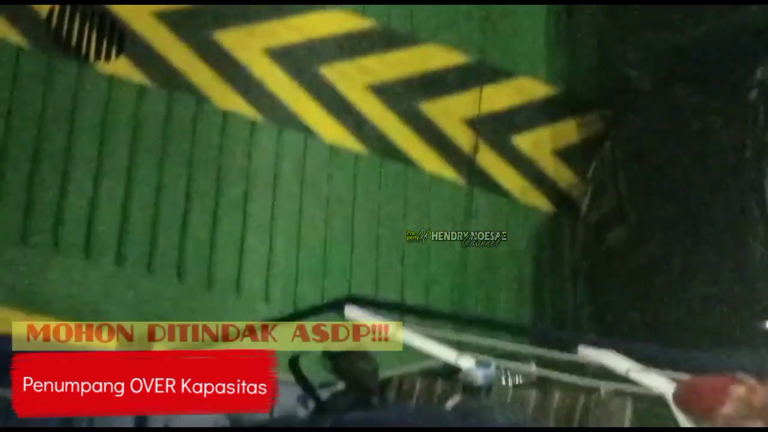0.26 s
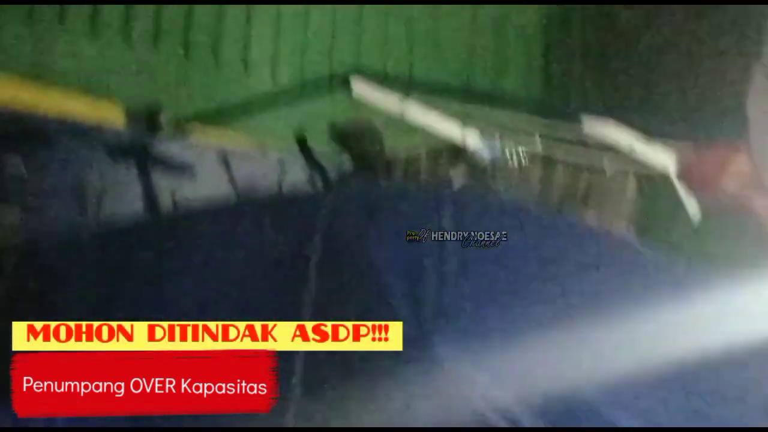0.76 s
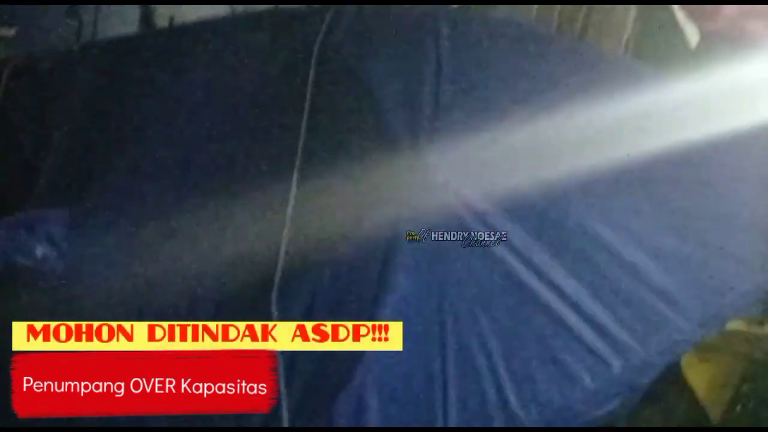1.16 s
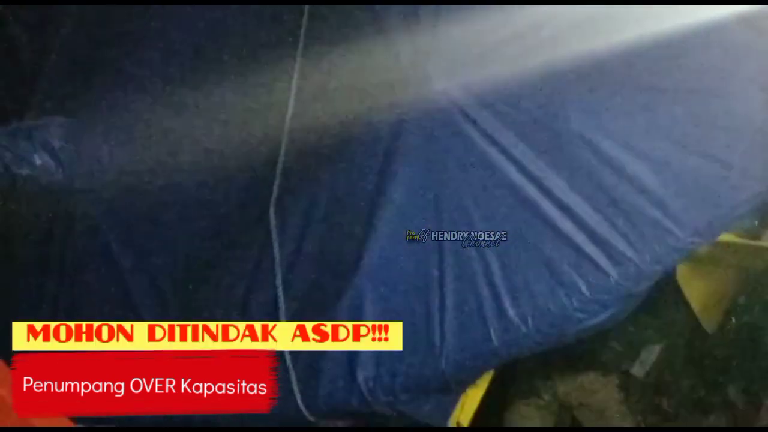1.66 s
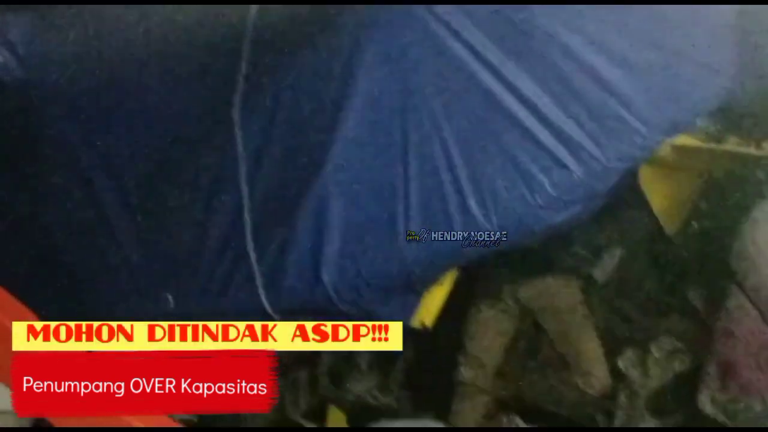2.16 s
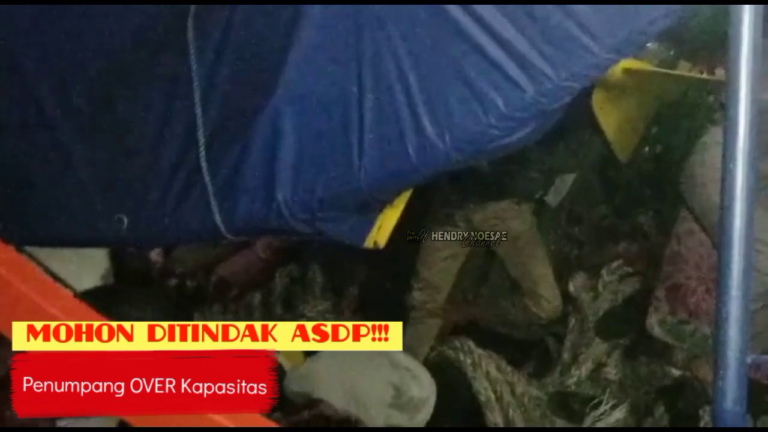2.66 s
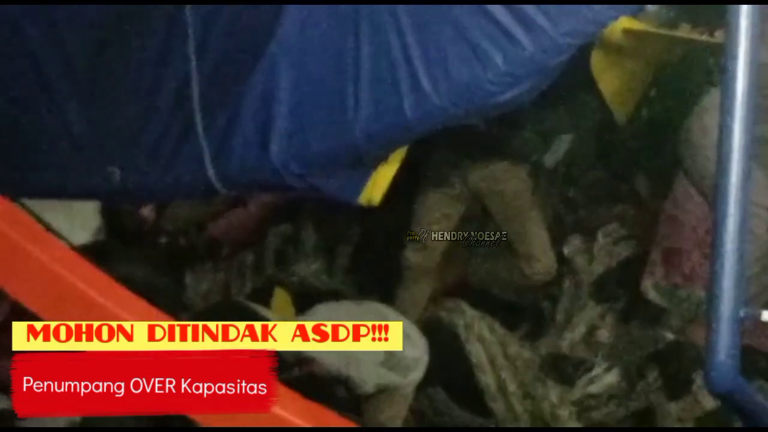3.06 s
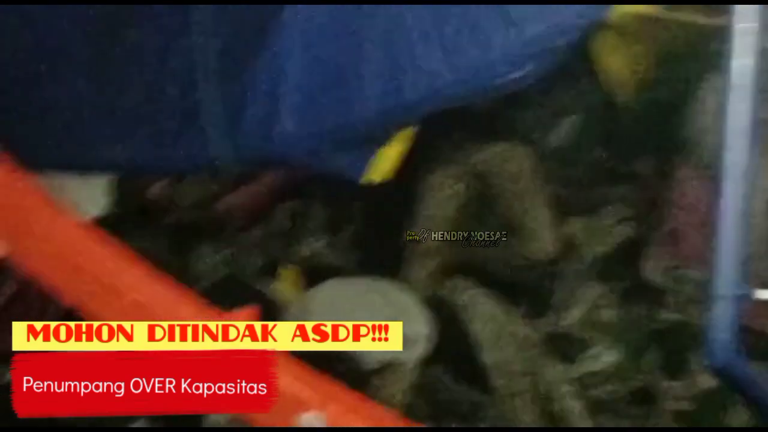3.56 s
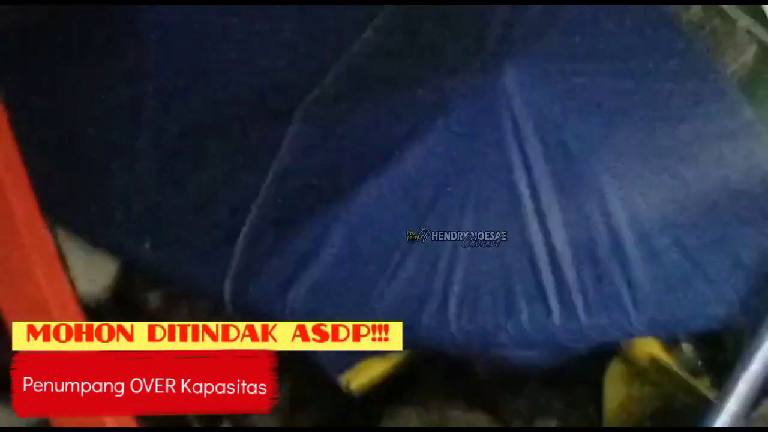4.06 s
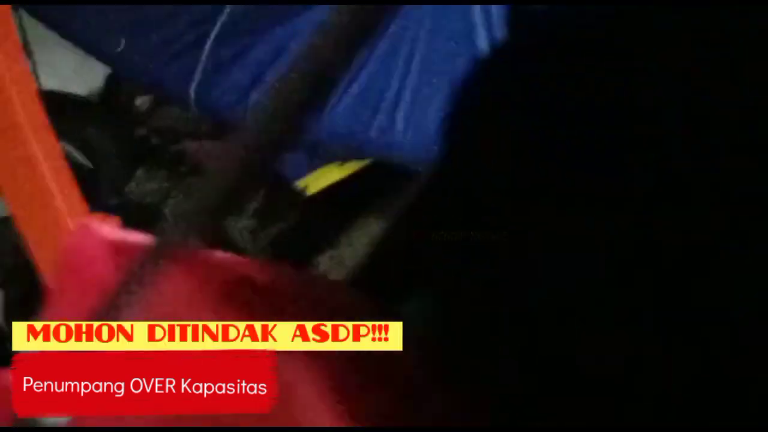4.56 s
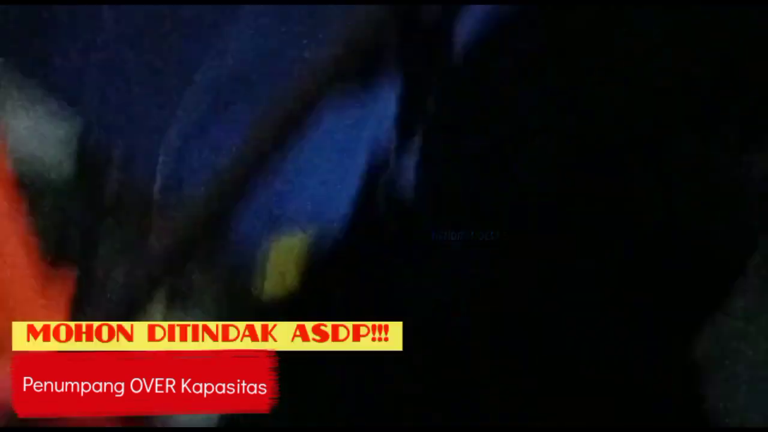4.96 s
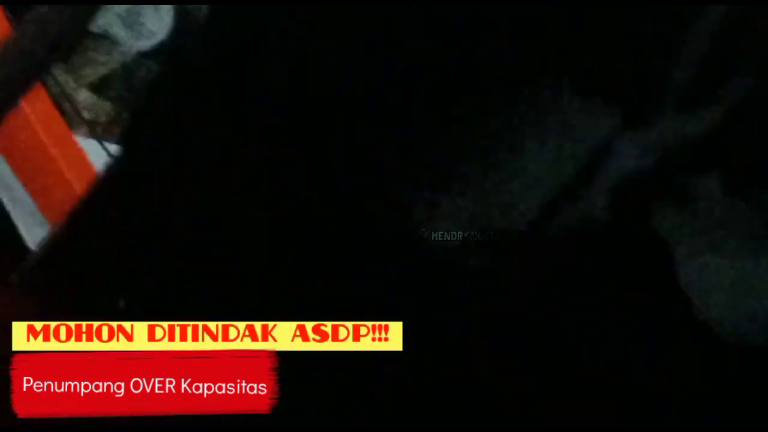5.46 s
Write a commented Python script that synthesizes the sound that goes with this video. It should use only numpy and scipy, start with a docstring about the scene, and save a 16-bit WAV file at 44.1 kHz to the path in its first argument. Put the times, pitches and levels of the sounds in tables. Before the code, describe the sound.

Heavy ship diesels drone with a low, even throb under rushing vent air, until a hand rubs and knocks the phone at the end.

```python
"""A deep drone runs throughout: two six-cylinder diesels at almost the same speed beat slowly on a ferry deck.
Their exhausts are summed as harmonic orders; plating and valve gear ring once or more in each engine cycle.
Filtered noise makes the rush of ventilation air, the hull rumble and the intake; a generator fitting ticks.
At the end the phone is swung round: a hand rubs over its case by stick-slip and knocks it,
and the edge of the case gives a brief double click."""
import sys
import numpy as np
from scipy import signal
from scipy.fft import rfft, irfft
from scipy.io import wavfile
from scipy.ndimage import uniform_filter1d

SR = 44100
rng = np.random.default_rng(int(sys.argv[2]) if len(sys.argv) > 2 else 0)


def pcm_store(signal):
    """Save signal as 16-bit PCM."""
    levels = np.round(np.clip(np.atleast_2d(signal), -1, 1) * 32767)
    wavfile.write(sys.argv[1], SR, levels.astype(np.int16).T)


N = 251370
TIME = np.arange(N) / SR  # s
FREQ = np.maximum(np.fft.rfftfreq(N, 1 / SR), 1)  # Hz, kept off zero for the logarithms

# mean four-stroke cycle rates of the two main engines, and a moment when they run nearly in step
FIRST_HZ, SECOND_HZ, IN_STEP_S = 11.138, 11.215, 1.15
# response of the phone case: f/Hz, relative level/dB
CASE_RESPONSE = [(25, -28), (60, -19), (100, -23), (170, -9), (330, 2), (450, -9.5), (720, -8.5),
                 (1000, -17), (2100, -28), (3700, -38), (4800, -46.5), (7000, -68)]


def undb(db):
    """Convert a level to an amplitude ratio: 20 dB is a factor of ten."""
    return 10 ** (np.asarray(db) / 20)


def level(x, db):
    """Scale a signal to an rms level in dB re 1."""
    return x * undb(db) / np.sqrt(np.mean(x ** 2))


def noise():
    """White noise: equal mean power at all frequencies."""
    return rng.standard_normal(N)


def walk(rate):
    """Random modulation: low-passed noise of rms 1 that changes about rate times a second."""
    lowpass = np.exp(-(FREQ / rate) ** 2)
    return level(irfft(rfft(noise()) * lowpass, N), 0)


def ramp(start, length):
    """Raised-sine transition from 0 to 1."""
    return np.sin(np.pi / 2 * np.clip((TIME - start) / length, 0, 1)) ** 2


def swell(start, attack, hold, release):
    """Smooth envelope: rise to 1, stay, and fall back to 0."""
    return ramp(start, attack) * (1 - ramp(start + attack + hold, release))


def bursts(events, decay_s):
    """Exponential decay: sudden starts (t/s, level/dB) that die away."""
    out = 0
    for start, db in events:
        age = np.minimum(np.abs(TIME - start) / decay_s, 20)
        out = out + undb(db) * (TIME > start) * np.exp(-age)
    return out


def strokes(phase, decay):
    """Periodic relaxation: a jump at each whole turn, dying away within a share of the turn."""
    return np.exp(-(phase % 1) / decay)


def colour(x, points):
    """Minimum-phase filter through (f/Hz, level/dB) points, made causal by folding the cepstrum."""
    hz, db = np.transpose(points)
    above = np.clip(np.log2(FREQ / hz[-1]), 0, 1)  # the octave above the last point falls 50 dB more
    gain = undb(np.interp(np.log(FREQ), np.log(hz), db) - 50 * above)
    cepstrum = irfft(np.log(gain), N)
    cepstrum[1:N // 2] *= 2
    cepstrum[N // 2 + 1:] = 0
    return irfft(rfft(x) * np.exp(rfft(cepstrum)), N)


def ring(x, modes):
    """Modal superposition: squared resonance curves (f/Hz, width/Hz, level/dB) with steep skirts."""
    response = 0
    for hz, width, db in modes:
        detuning = .5j * hz / width * (FREQ / hz - hz / FREQ)
        response = response + undb(db) / (1 + detuning) ** 2
    return irfft(rfft(x) * response, N)


def excite(envelope, hz, width):
    """Noise-driven resonance: narrowing the band is made good, so the rms follows the envelope."""
    return ring(noise() * envelope, [(hz, width, 0)]) * np.sqrt(SR / (np.pi * width))


def place(lean_from=0.37, lean_s=3.03, stays_back=0.31):
    """Position sets the mixture: shares 0-1 drawn back, away from the rail in all, behind the bulkhead."""
    # drawing back on deck once: start t/s, going/s, staying/s, returning/s
    draw_back = (3.68, 0.087, 0.676, 0.33)
    # passing behind the bulkhead: start t/s, length/s
    behind_bulkhead = (3.75, 0.69)
    drawn, shelter = swell(*draw_back), ramp(*behind_bulkhead)
    leaning = lean_from * (1 - ramp(0, lean_s))  # the phone leans out to the rail
    back = np.clip(leaning + drawn + stays_back * shelter, 0, 1)
    return drawn, back, shelter


def cycles(hz, wander):
    """Phase is accumulated speed, in engine cycles; the governor lets the speed wander a little."""
    return hz * (TIME - IN_STEP_S) + wander * walk(1.6)


def drone(first, second, shelter, drone_db=-0.6, waver_db=0.27):
    """Interference: both exhausts sound the same orders, so each order beats at its own rate."""
    # exhaust orders: multiple of the cycle rate (rounded in use), relative level of first engine/dB,
    # relative level of second engine/dB, change by standing waves at the bulkhead/dB
    exhaust_orders = [(3, -50, -61, -2.5), (4, -57, -57.5, -3.5), (6, -29, -37, 1), (8, -59.5, -55, 6),
                      (9, -36.5, -58, 0), (10, -60, -48, 6), (11, -41.5, -62.5, -4), (12, -34.5, -27.5, 1),
                      (13, -50, -53.5, -10), (14, -56, -36, 1.5), (15, -30, -68, -4.5), (16, -36, -40, -3),
                      (17, -40, -68.5, 0.5), (18, -51.5, -40, 5), (19, -36.5, -57, -3),
                      (20, -38.5, -51, 7.5), (21, -44, -50.5, 6.5), (22, -51, -51, 0.5),
                      (23, -39.5, -55.5, 3.5), (25, -53.5, -67.5, 3.5), (28, -55, -64.5, -2),
                      (29, -46, -61, 0), (32, -52.5, -66, 3.5), (33, -51, -69, 1.5), (39, -59, -68, 3.5),
                      (55, -62, -63.5, 9.5), (63.8, -56, -62.5, -5)]
    out, wavers = 0, [walk(6.0) for _ in range(3)]
    for order, first_db, second_db, sheltered_db in exhaust_orders:
        lag = rng.random()  # the path to the deck delays each order by its own amount
        waver = rng.standard_normal(3) @ wavers
        pair = 0
        for phase, db in ((first, first_db), (second, second_db)):
            pair = pair + undb(db) * np.cos(2 * np.pi * (round(order) * phase + lag))
        gain_db = drone_db + sheltered_db * shelter + waver_db * waver / np.sqrt(3)
        out = out + np.sqrt(2) * pair * undb(gain_db)
    return out


def shudder(phase, shelter, onset=.33, fade=0.36, steady=0.43, steady_sheltered=0.16,
            rattle_width_hz=26, loose=0.31, uneven_db=2.5, shudder_db=-40):
    """Forced vibration: one hard-firing cylinder shakes the plating for part of each cycle."""
    # plating: f/Hz, length as a share of the cycle, order of its lasting hum, relative level/dB
    plates = [(333, 0.33, 31, 1), (459.7, 0.52, 42, -0.5)]
    since, out = (phase - onset) % 1, 0
    lasting = np.clip(steady + steady_sheltered * shelter, 0, 1)  # more hum behind the bulkhead
    for hz, length, order, db in plates:
        age = np.clip(since / length, 0, 1)
        shake = np.sqrt(np.sin(np.pi * age).clip(0)) * np.exp(-fade * age)
        locked = level(shake * np.sin(2 * np.pi * hz * since / FIRST_HZ), 0)
        rattling = level(ring(shake * noise(), [(hz, rattle_width_hz, 0)]), 0)
        hum = np.sqrt(2) * np.sin(2 * np.pi * round(order) * since)
        plate = (1 - lasting) * (locked + loose * rattling) + lasting * hum
        out = out + level(plate, shudder_db + db)
    return out * undb(uneven_db * walk(6.7))


def valves(phase, decay=0.69, steady=1.0, loose=1.3, lag=.3, lopsided=0.26, loudest=0.43,
           clatter_db=-40.5):
    """Impact excitation: valves of six cylinders shut in turn and ring the casing, nearer ones louder."""
    # engine casing: f/Hz, width/Hz, relative level/dB
    casing_modes = [(642.5, 47, 0.5), (698.6, 32, 3), (738, 59, 0)]
    # the same noise is read afresh in every cycle
    repeated = noise()[(phase % 1 * SR / FIRST_HZ).astype(int)]
    nearness = 1 + lopsided * np.cos(2 * np.pi * (phase - loudest))
    taps = steady + strokes(6 * phase - lag, decay) * nearness
    return level(ring(taps * (repeated + loose * noise()), casing_modes), clatter_db)


def intake(phase, per_three=0.34, per_six=0.3, fleck_db=2.5, sway_db=2.5, sway_period_s=2.8,
           loudest_s=0.2, intake_db=-52):
    """Amplitude modulation: air gulped with the firings rings pipes that flicker singly and sway together."""
    # engine air intake: f/Hz, width/Hz, relative level/dB
    pipe_modes = [(2147, 110, 2.5), (2634, 78, 4), (2946, 160, -6)]
    gulps = 1 + per_three * np.cos(2 * np.pi * 3 * phase) + per_six * np.cos(2 * np.pi * 6 * phase)
    pipes = sum(ring(gulps * noise(), [mode]) * undb(fleck_db * walk(21)) for mode in pipe_modes)
    sway = undb(sway_db * np.cos(2 * np.pi * (TIME - loudest_s) / sway_period_s))
    return level(pipes, intake_db) * sway


def squeals(length_s=0.011, quiver=0.12):
    """Pipe tones: the intake sings out briefly in sinusoids with a slight phase quiver."""
    # squeals: middle t/s, f/Hz, level/dB
    short_tones = [(1.995, 2530, -43), (3.037, 2650, -41), (3.196, 2640, -43), (3.336, 2150, -40.5)]
    wobble, out = quiver * walk(58), 0
    for s, hz, db in short_tones:
        tone = np.sqrt(2) * np.sin(2 * np.pi * (hz * TIME + wobble))
        out = out + undb(db) * swell(s - length_s, length_s, 0, length_s) * tone
    return out


def handling(slips_per_s=1400, slip_spread_db=-0.5, rub_db=-1.0, groan=0.55, groan_width=0.34):
    """Stick-slip friction: random slips of the skin excite the phone's case and a groaning resonance."""
    # rubs: start t/s, length/s, relative level/dB, groan f/Hz
    rub_events = [(5.413, 0.051, -26.5, 327), (5.495, 0.038, -22, 444), (5.536, 0.025, -23, 440),
                  (5.555, 0.028, -26.5, 746), (5.573, 0.066, -35, 520), (5.636, 0.025, -18.5, 520),
                  (5.655, 0.027, -21, 476), (5.684, 0.0095, -25.5, 1300)]
    slipping = rng.random(N) < slips_per_s / SR
    slips = slipping * np.sign(noise()) * undb(slip_spread_db * noise().clip(-2, 2))
    slips = level(slips, 0)
    case, out = level(colour(slips, CASE_RESPONSE), 0), 0
    for s, length, db, hz in rub_events:
        age = np.clip((TIME - s) / length, 0, 1)
        pressure = undb(db) * np.sqrt(np.sin(np.pi * age).clip(0))
        groaning = level(ring(slips, [(hz, groan_width * hz, 0)]), 0)
        out = out + pressure * (case + groan * groaning)
    return out * undb(rub_db) / np.sqrt(1 + groan ** 2)


def knocks(click_s=0.0017, thud=0.7, thud_s=.006):
    """Contact time limits bandwidth: finger knocks are duller the longer they touch; the edge clicks twice."""
    # knocks: t/s, peak level/dB, contact time/s, thud f/Hz
    blows = [(5.4205, -14, 0.0012, 300), (5.449, -15.5, 0.0011, 332), (5.498, -14, 0.00025, 486),
             (5.502, -12.5, 0.0016, 170), (5.525, -17.5, 0.00036, 400), (5.551, -23, .0004, 422),
             (5.5655, -9, 0.00061, 760), (5.64, -6, 0.0016, 230), (5.654, -5.5, 0.00071, 246),
             (5.6633, -12.5, 0.00033, 387), (5.6659, -8, 0.00059, 258), (5.6877, -24.5, 0.00026, 330)]
    # edge of the case: f/Hz, width/Hz, relative level/dB
    edge_modes = [(1450, 300, 2), (2390, 370, -2.5), (3570, 300, -3.5)]
    # clicks of the edge: t/s, relative level/dB
    edge_clicks = [(5.6612, -31), (5.6663, -28.5)]
    case = colour(signal.unit_impulse(N), CASE_RESPONSE)[:SR // 10]
    out, age = np.zeros(N + SR), TIME[:len(case)]
    for s, db, contact_s, hz in blows:
        thudding = thud * np.sin(2 * np.pi * hz * age) * np.exp(-age / thud_s)
        body = case / np.abs(case).max() + thudding
        blow = np.convolve(body, np.hanning(int(contact_s * SR) + 3))
        begin = int(s * SR)
        out[begin:begin + len(blow)] -= undb(db) * blow / np.abs(blow).max()
    edge = sum(undb(db) * excite(bursts(edge_clicks, click_s), hz, width) for hz, width, db in edge_modes)
    return out[:N] + edge


def sleeve(crinkle_db=3.5, snap_s=0.0079, snap_hz=5600, snap_width_hz=1300):
    """Narrow-band noise on a gliding carrier: cloth swishes near the microphone and its creases snap."""
    # strokes of the sleeve: start t/s, attack/s, release/s, f/Hz, glide/(Hz/s), width/Hz, relative level/dB
    brush_strokes = [(3.83, 0.055, 0.046, 1760, 0, 400, -50), (4.72, 0.21, 0.22, 2760, 498, 330, -56),
                     (4.76, 0.18, 0.2, 4960, -1700, 360, -67), (5.04, 0.16, .08, 6100, -2000, 650, -71),
                     (5.26, 0.092, 0.13, 3470, -4000, 650, -51.5), (5.46, 0.11, 0.2, 2370, -2, 600, -46.5)]
    # creases snapping: t/s, relative level/dB
    crease_snaps = [(5.076, -59), (5.14, -66), (5.204, -61), (5.454, -59), (5.584, -56), (5.640, -56)]
    swish = 0
    for s, attack, release, hz, glide, width, db in brush_strokes:
        pitch = hz + glide * np.clip(TIME - s, 0, attack + release)
        phase = 2 * np.pi * np.cumsum(pitch) / SR
        band = walk(width) * np.cos(phase) + walk(width) * np.sin(phase)
        swish = swish + undb(db) * swell(s, attack, 0, release) * band
    snapping = excite(bursts(crease_snaps, snap_s), snap_hz, snap_width_hz)
    return swish * undb(crinkle_db * walk(40)) + snapping


def fitting(generator_hz=25.75, tick_at_s=0.967, spell_s=(0.57, 0.45, 1.15, 0.35), tick_db=-63.5,
            attack_s=0.0036, tick_s=0.01, uneven_db=1.0, shift_db=5.5):
    """Periodic impacts: a loose fitting ticks at generator turns and singly, its modes shifting in balance."""
    # single ticks, louder or softer, some outside the regular spell: t/s, relative level/dB
    single_ticks = [(0.615, -67), (0.969, -57), (1.005, -61.5), (1.124, -57), (1.2, -56.5), (1.277, -57.5),
                    (1.316, -60), (1.354, -59), (1.432, -64), (1.509, -58), (1.588, -58), (1.666, -57),
                    (1.785, -59), (1.9, -63), (2.018, -61.5), (2.056, -62), (2.095, -59), (2.135, -62.5),
                    (2.212, -62), (2.29, -62), (2.366, -64), (2.523, -63), (2.836, -62)]
    # fitting: f/Hz, width/Hz, relative level/dB
    fitting_modes = [(4690, 200, -5), (5430, 260, -2.5), (5960, 240, -7.5), (6800, 390, -9.5)]
    turns = generator_hz * (TIME - tick_at_s)
    turn = (turns - np.floor(turns[0])).astype(int)
    uneven = uneven_db * np.minimum(rng.standard_normal(turn[-1] + 1), 1)
    strength = undb(tick_db + uneven)[turn]
    # the spell is start, attack, hold, release
    regular = strength * strokes(turns, tick_s * generator_hz) * swell(*spell_s)
    taps = np.maximum(regular, bursts(single_ticks, tick_s))
    taps = uniform_filter1d(taps, int(attack_s * SR) + 1)  # softens the attack
    out = 0
    for hz, width, db in fitting_modes:
        out = out + excite(taps, hz, width) * undb(db + shift_db * np.tanh(walk(18)))
    return out


def auxiliaries(shelter, whistle_hz=4797, whistle_db=-75.5, hums_screened_db=-6, whistle_screened_db=-8,
                whistle_fade_db=-7, fade_from_s=.4, fade_s=1.2, whistle_wander=0.26, drift=0.016):
    """Phase-wandering sinusoids: hums of generator and pumps, and a thin turbocharger whistle that fades."""
    # generator and pumps: f/Hz, level in the open/dB
    machine_hums = [(51.2, -47), (76.8, -42.5), (83.0, -39), (85.2, -52), (95.9, -51.5)]
    hums = 0
    for hz, db in machine_hums:
        hums = hums + level(np.sin(2 * np.pi * (hz * TIME + drift * walk(5.5))), db)
    whistle = level(np.sin(2 * np.pi * (whistle_hz * TIME + whistle_wander * walk(17))), whistle_db)
    whistle_gain_db = whistle_screened_db * shelter + whistle_fade_db * ramp(fade_from_s, fade_s)
    return hums * undb(hums_screened_db * shelter) + whistle * undb(whistle_gain_db)


def rumble(rumble_db=-33.5, swell_db=1.0):
    """Broadband turbulence: coloured noise for hull and wake, swelling unevenly."""
    # hull and wake: f/Hz, relative density level/dB
    hull_spectrum = [(20, -78.5), (40, -83.5), (60, -65.5), (88, -56.5), (115, -59.5), (170, -55),
                     (240, -58), (300, -61), (350, -59.5), (410, -63), (530, -71), (700, -70), (900, -75),
                     (1200, -82)]
    return level(colour(noise(), hull_spectrum), rumble_db) * undb(swell_db * walk(6.5))


def air(back, air_db=-49, flutter_db=1.5, rail_db=1.0, deck_db=2.0):
    """Power-weighted mixing: rushing ventilation air shifts in colour as the phone draws back."""
    # air heard out over the rail: f/Hz, relative density level/dB
    rail_spectrum = [(600, -96), (1000, -75), (1250, -79.5), (1570, -93), (1850, -80), (2170, -81),
                     (2370, -81), (2650, -83.5), (3000, -91.5), (3550, -90.5), (4000, -105), (4700, -101),
                     (5300, -108), (6500, -108), (8000, -123)]
    # air heard further back on deck: f/Hz, relative density level/dB
    deck_spectrum = [(600, -93), (1000, -76), (1150, -81.5), (1450, -78.5), (1850, -79.5), (2300, -81.5),
                     (2950, -81), (3550, -89.5), (4200, -100), (4700, -101), (5200, -110), (6500, -109),
                     (8000, -121)]
    at_rail = level(colour(noise(), rail_spectrum), rail_db)
    on_deck = level(colour(noise(), deck_spectrum), deck_db)
    rush = np.sqrt(1 - back) * at_rail + np.sqrt(back) * on_deck
    return rush * undb(air_db + flutter_db * walk(45))


def grille(hz=2950, width_hz=420, grille_db=-53, passed_from_s=0.21, passed_s=0.97):
    """Resonant flow noise: a ventilation grille hisses and fades as the phone turns away from it."""
    return level(ring(noise(), [(hz, width_hz, 0)]), grille_db) * (1 - ramp(passed_from_s, passed_s))


def steel_echo(x, back, echo=.3, sway_s=.00022):
    """Comb filtering: steelwork returns the hiss, and peaks and notches slide as the phone moves."""
    # echoes: delay at the rail/s, delay back on deck/s
    echo_delays = [(.0019, .0023), (.0034, .0029), (.0047, .0053), (.0071, .0064)]
    moved, out = uniform_filter1d(back, SR // 2), x
    for near_s, far_s in echo_delays:
        delay = near_s + (far_s - near_s) * moved + sway_s * walk(1.97)  # the hand sways
        out = out + echo * np.interp(TIME - delay, TIME, x)
    return out / np.sqrt(1 + len(echo_delays) * echo ** 2)


def buffet(gust_hz=105, gust_width_hz=55, buffet_db=-28.5, swing_from_s=5.01, swing_s=0.6):
    """Flow noise: low eddies at the microphone port grow as the phone swings."""
    return level(ring(noise(), [(gust_hz, gust_width_hz, 0)]), buffet_db) * ramp(swing_from_s, swing_s)


def scene(wander=0.0022, plating_back_db=-3, valves_drawn_db=-3.5, valves_shelter_db=2.0,
          intake_drawn_db=-3, intake_shelter_db=-9, air_shelter_db=-0.2):
    """Linear superposition of engines, ship and hand; the phone's place sets how well each is heard."""
    # standing waves between deck and bulkhead: f/Hz, width/Hz, relative level/dB
    bulkhead_modes = [(226.4, 24, -3.5), (358, 45, -5), (508, 32, 3.5)]
    first, second = cycles(FIRST_HZ, wander), cycles(SECOND_HZ, wander)
    drawn, back, shelter = place()
    # away from the rail the plating is screened, and the bulkhead makes the hull boom
    hull = shudder(first, shelter) * undb(plating_back_db * back) + rumble()
    boom = shelter * ring(hull, bulkhead_modes)
    # drawing back screens valves and intake; the bulkhead reflects the clatter and hides the intake
    clatter = valves(first) * undb(valves_drawn_db * drawn + valves_shelter_db * shelter)
    gulping = intake(first) * undb(intake_drawn_db * drawn + intake_shelter_db * shelter)
    # the vents stay almost as loud behind the bulkhead
    vents = steel_echo(air(back) + grille(), back) * undb(air_shelter_db * shelter)
    engines = drone(first, second, shelter) + hull + boom + clatter + gulping + squeals()
    ship = engines + vents + auxiliaries(shelter) + fitting()
    hand = sleeve() + buffet() + handling() + knocks()
    return (ship + hand)[None]


def record(dry, hiss_db=-89, dull_hz=7700, top_hz=15700):
    """Low-pass response: the phone's microphone is dull in the treble and hisses faintly; the top is cut."""
    dull = signal.sosfilt(signal.butter(8, dull_hz, fs=SR, output="sos"), dry)
    hissing = dull + undb(hiss_db) * noise()
    return signal.sosfilt(signal.ellip(8, .2, 70, top_hz, fs=SR, output="sos"), hissing)


dry = scene()
out = record(dry)
pcm_store(out)
```